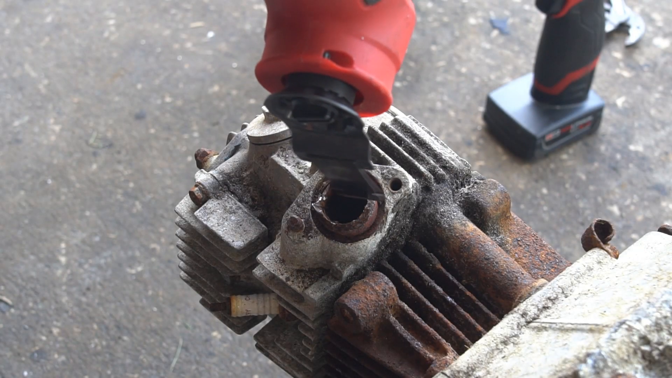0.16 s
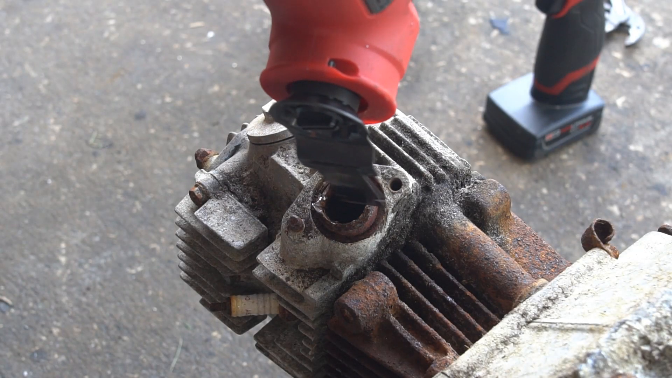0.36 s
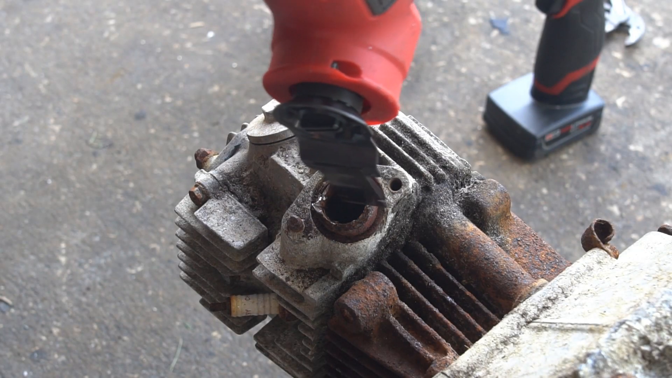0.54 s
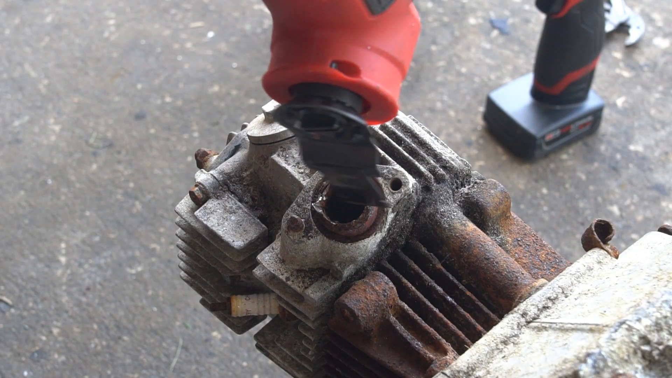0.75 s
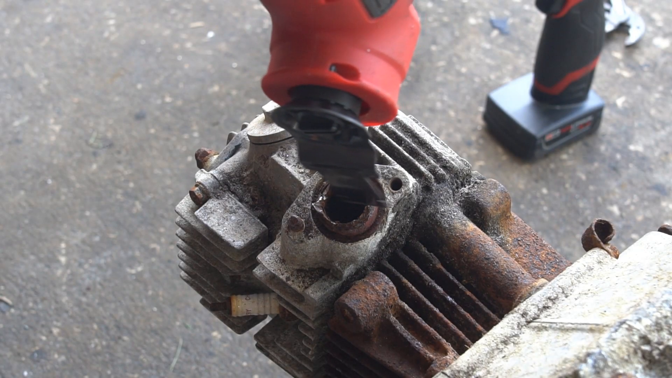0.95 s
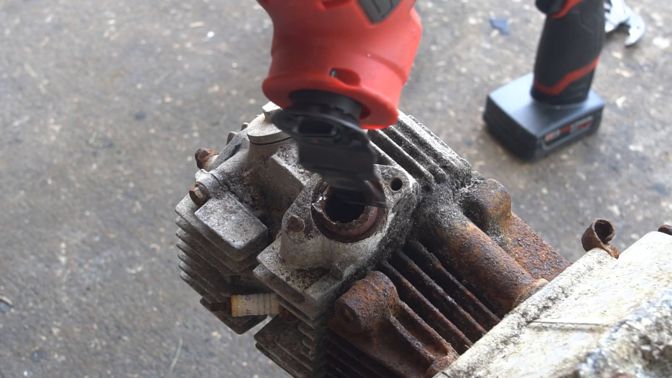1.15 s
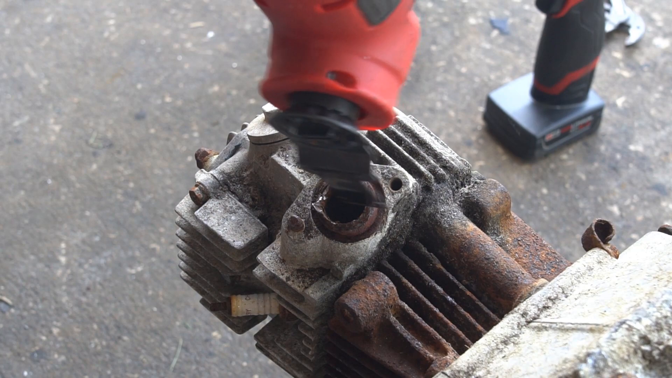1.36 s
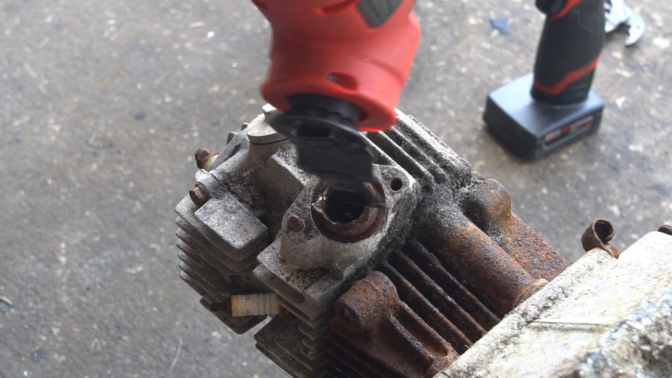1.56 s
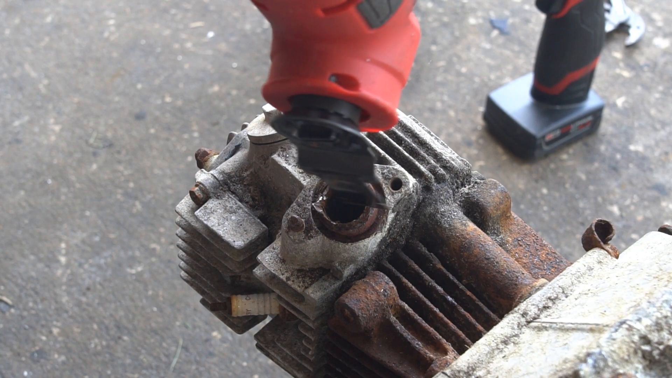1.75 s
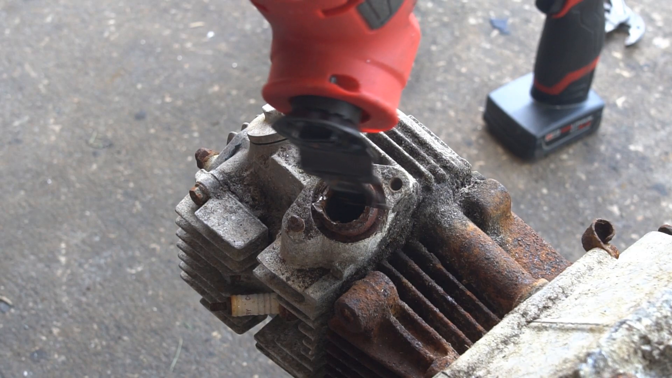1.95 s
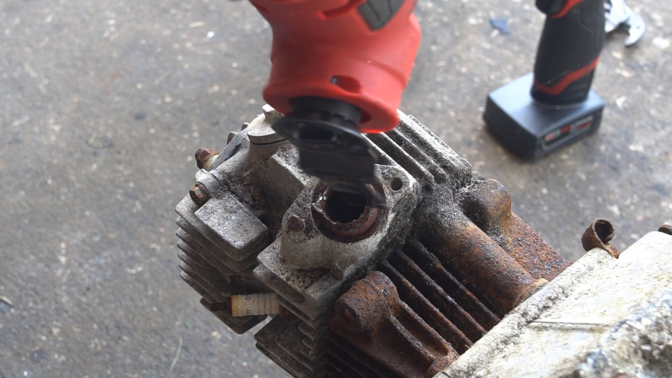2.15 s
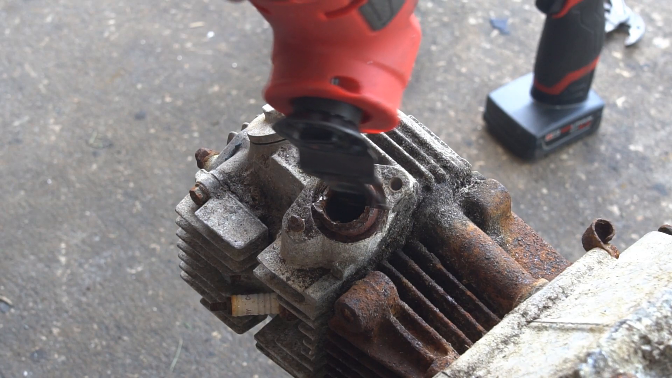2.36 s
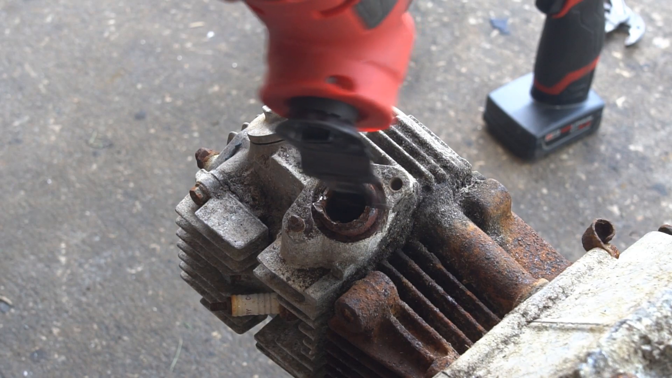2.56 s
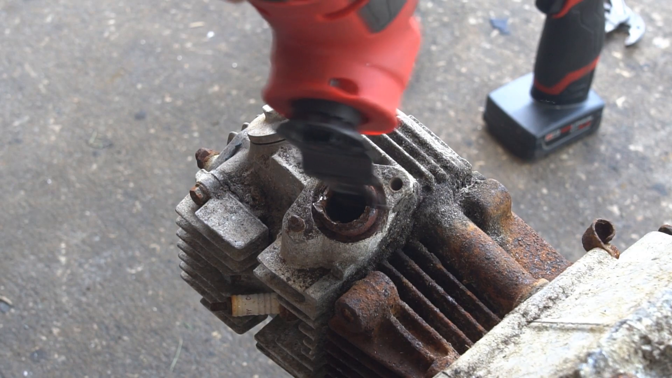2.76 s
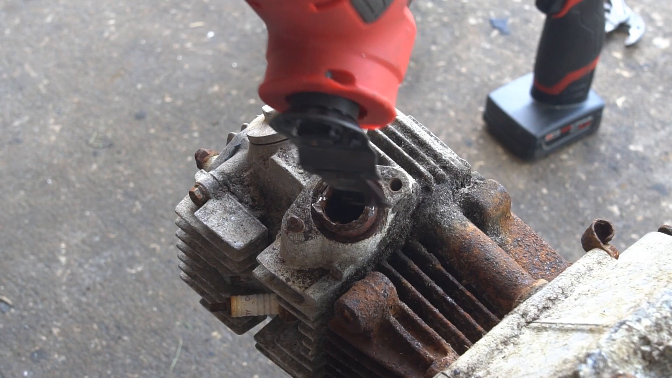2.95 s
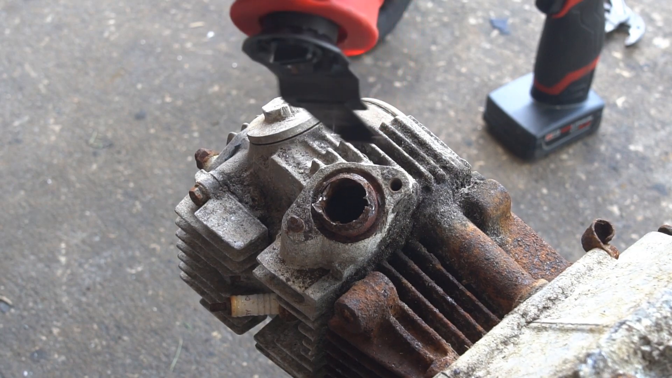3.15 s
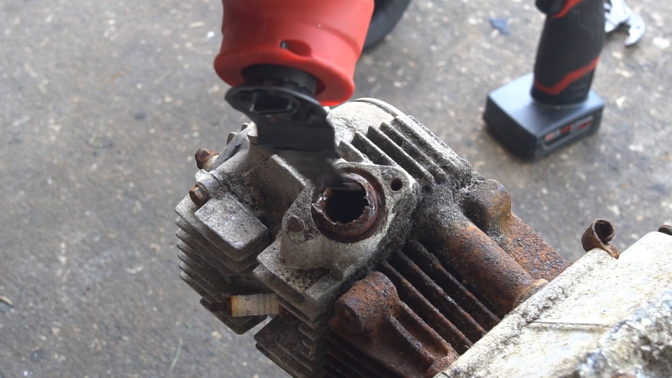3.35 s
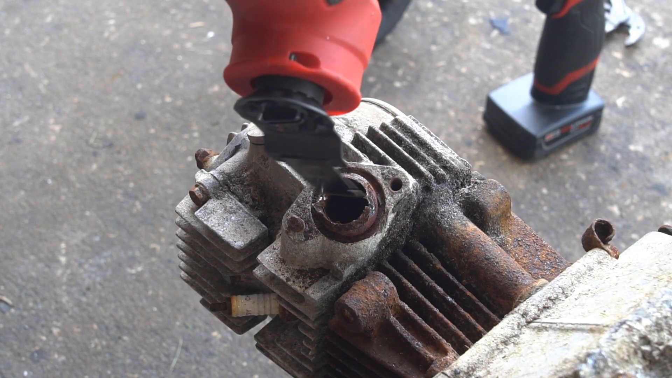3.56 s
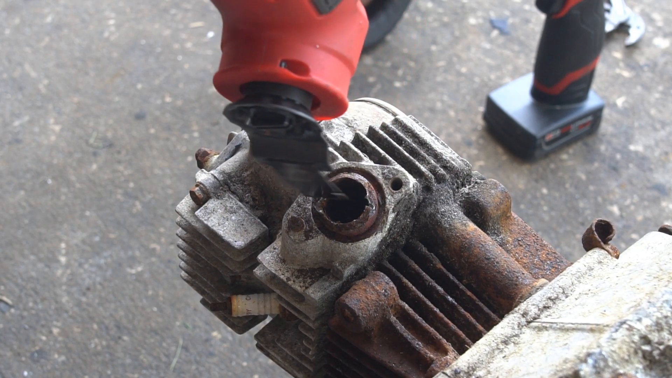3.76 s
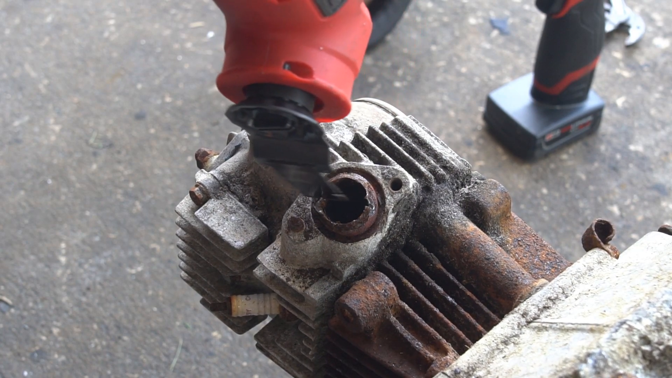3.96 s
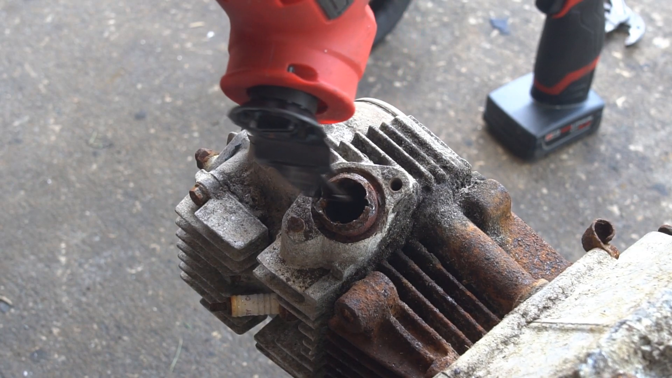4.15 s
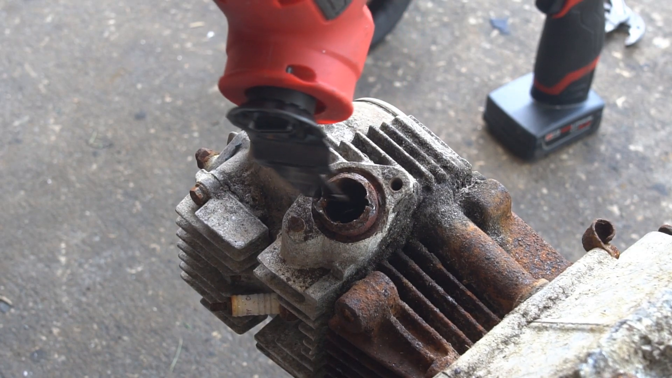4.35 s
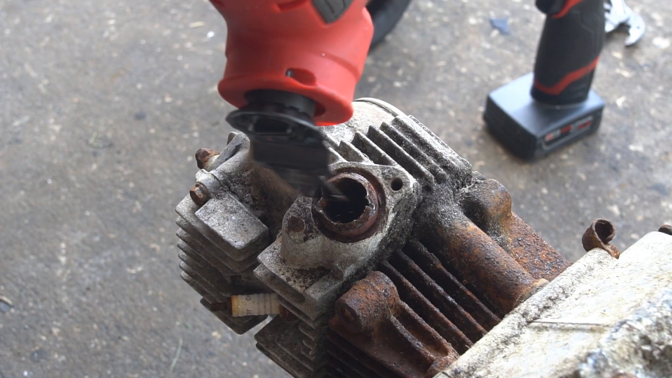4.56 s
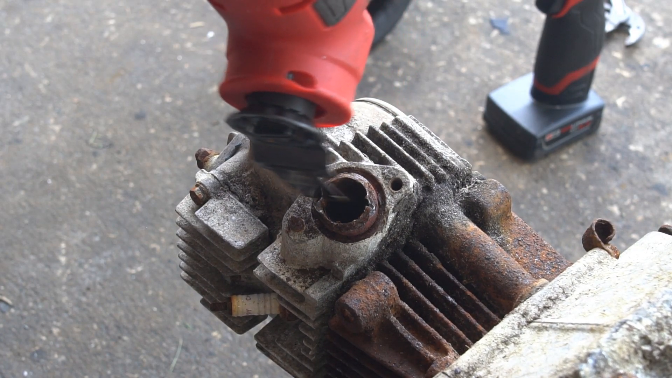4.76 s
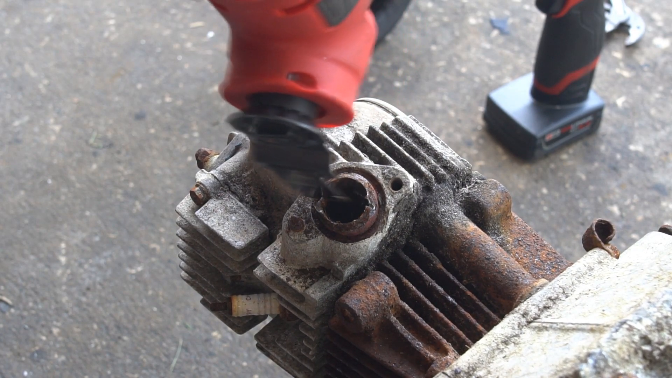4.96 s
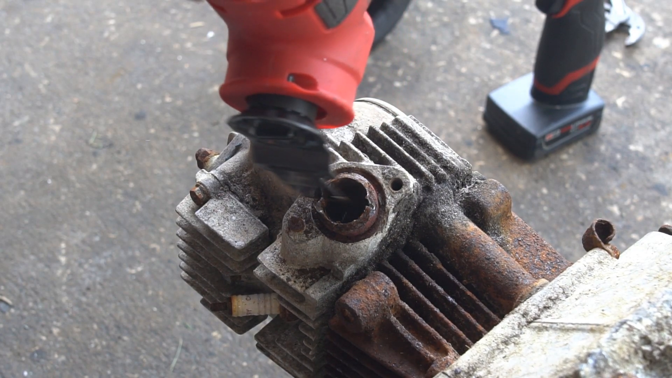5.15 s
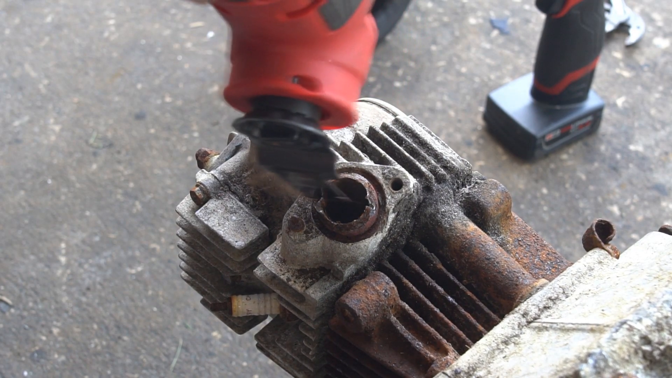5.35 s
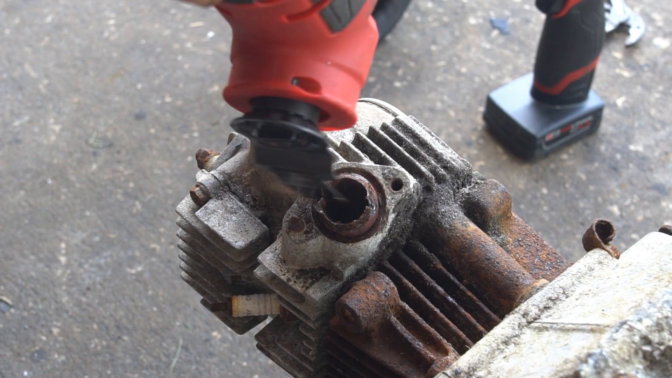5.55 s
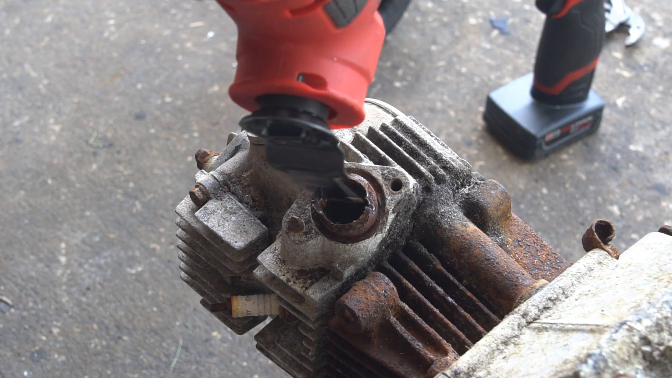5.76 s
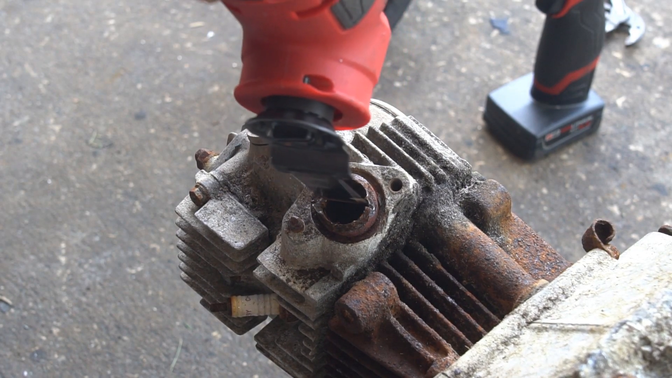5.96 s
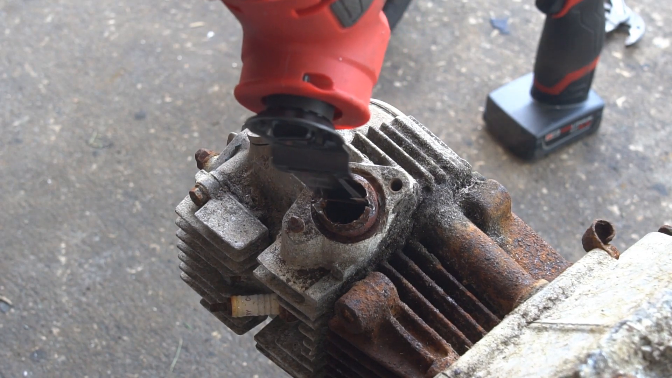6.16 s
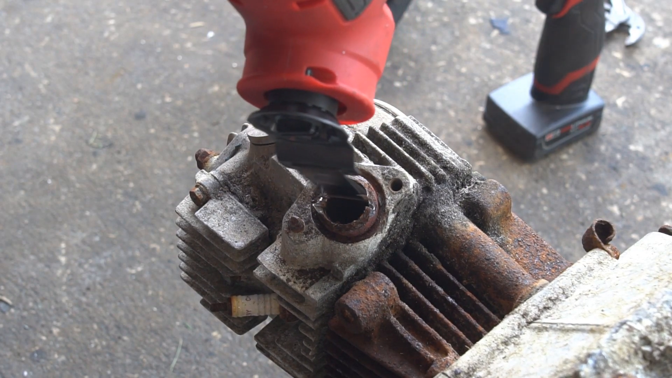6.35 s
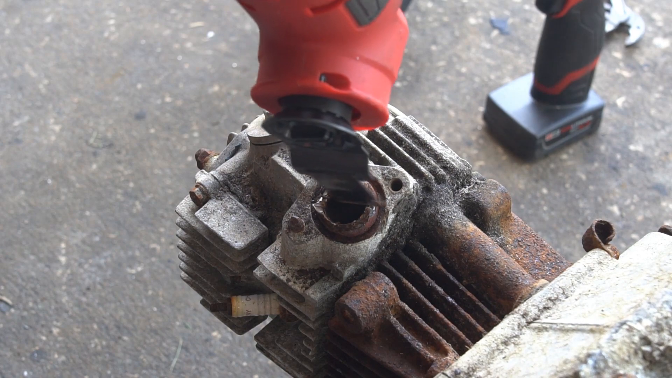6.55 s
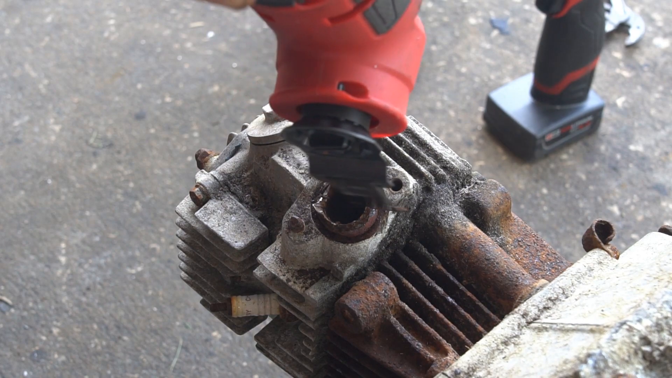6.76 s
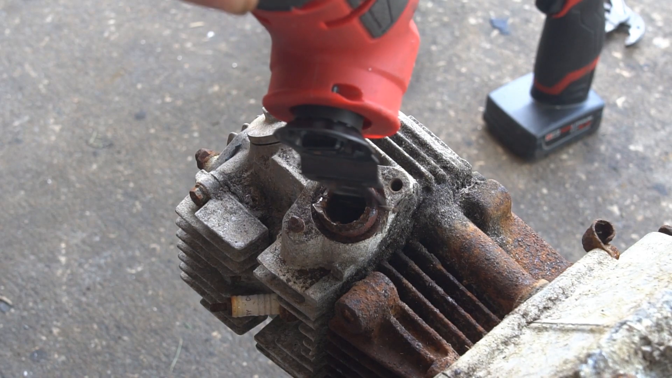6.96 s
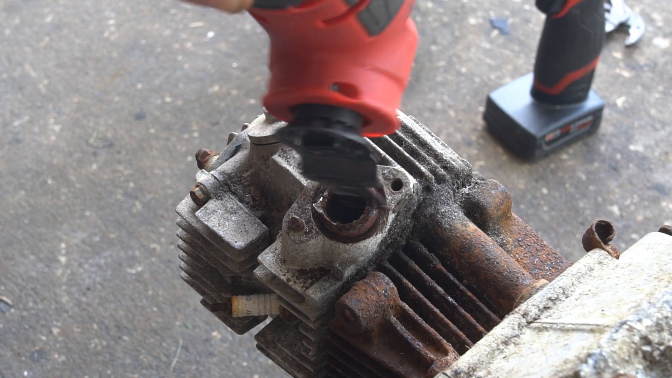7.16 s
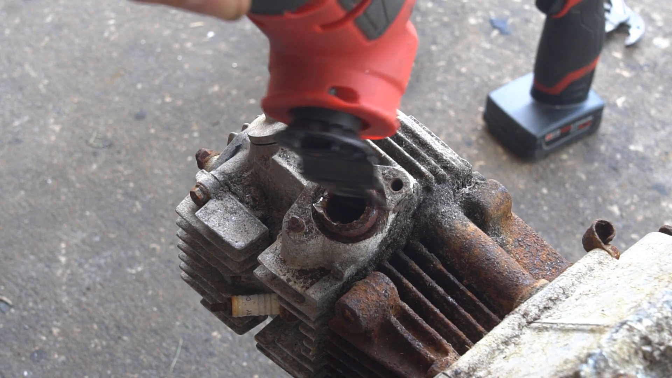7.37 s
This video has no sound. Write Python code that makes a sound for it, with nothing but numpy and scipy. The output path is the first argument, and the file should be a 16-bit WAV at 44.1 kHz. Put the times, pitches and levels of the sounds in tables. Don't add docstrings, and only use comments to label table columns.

```python
import sys
import numpy as np
from scipy import signal
from scipy.fft import rfft, irfft, next_fast_len
from scipy.io import wavfile
from scipy.ndimage import uniform_filter1d, map_coordinates

SR = 44100
rng = np.random.default_rng(int(sys.argv[2]) if len(sys.argv) > 2 else 0)


def natural_amplitude(level_db):
    exponent = np.asarray(level_db, float) / 20
    return 10 ** exponent


def digitize_waveform(pressure):
    field = np.atleast_2d(pressure).T
    bounded = np.clip(field, -1, 1)
    quanta = np.round(bounded * 32767).astype(np.int16)
    wavfile.write(sys.argv[1], SR, quanta)


N = 326781
T = np.arange(N) / SR

# (time [s], scrape [dB], share passed into the casting [dB])
CUT_LEVELS = [
    [(.29, -27, 3), (.3, -26, 1), (.45, -21, -2), (.7, -21.5, -1.5), (1.6, -18.5, -3), (2.86, -19, -2),
     (2.93, -24, -3), (2.96, -28.5, -7), (3.0, -33.5, -2)],
    [(3.678, -35.5, 9), (3.7, -28.5, 0), (3.74, -21, -9.5), (3.9, -20, -6), (4.2, -18.5, -6),
     (4.7, -19, -2.5), (5.72, -20, -2.5), (5.77, -28.5, -11.5), (5.85, -32.5, -5)],
    [(5.954, -35, 0), (6.0, -23.5, -11.5), (6.2, -21.5, -12.5), (6.29, -23, -8.5), (6.33, -31.5, -3),
     (6.41, -38, 2.5)],
    [(6.546, -28, -5), (6.585, -33, 2.5), (6.63, -29, -5), (6.71, -25, -3.5), (6.79, -25.5, -9),
     (6.83, -18.5, -6), (6.87, -21.5, -5), (7.41, -19, -2)],
]
# (time [s], share on the corner [0-1], share barely touching [0-1])
BLADE_HOLD = [(0, 0, 0.65), (.55, 0, 0.78), (.9, 0, 0.22), (1.3, 0, 0.04), (2.85, 0, 0), (3, 0, 0.12),
              (3.6, 0.7, 0.6), (3.75, 0.86, 0.12), (4.2, 0.99, 0.02), (5.7, 0.96, 0.04), (5.8, 0.6, 0.54),
              (6, 0.18, 0.94), (6.4, 0, 0.8), (6.7, 0, 0.44), (6.9, 0.08, 0.13), (7.41, 0, 0.02)]
# (time [s], lift depth [dB], lift length [s])
LIFT_BITES = [(0.344, 16, 0.012), (0.4617, 0.5, 0.022), (0.51, 16, 0.018), (.538, 6, .012), (.333, 7, .005),
              (.589, 6, .005), (.604, 12, .012), (.631, 9.5, 0.029), (.639, 11, .004), (.697, 6, .004),
              (.705, 2, .012), (.775, 1.5, 0.016), (.83, 2, 0.013), (.945, 6, 0.011), (1.265, 6, 0.019),
              (1.508, 6.5, 0.018), (2.05, 9, 0.01), (2.162, 3, 0.011), (2.68, 4, 0.011), (3.72, 11, 0.02),
              (3.775, 9.5, 0.03), (3.845, 8, 0.03), (3.91, 7.5, 0.02), (3.964, 4, 0.018),
              (4.029, -1, 0.012), (4.07, -3, 0.011), (6.06, 4, 0.014), (6.13, -1, 0.0099), (6.225, 1, .012),
              (4.124, 9, .006), (5.3946, 5, 0.0041), (5.999, 6, 0.015), (6.335, 3, 0.014), (6.385, 6, 0.01),
              (6.623, 23, 0.024), (6.7117, 7, 0.013), (6.732, 4, .006), (6.8244, 4, .012),
              (6.909, 5, 0.008), (6.9596, 2.5, 0.022), (7.214, 5, 0.013)]
# (time [s], level [dB])
TOOTH_STRIKES = [(.373, 7), (.404, 3), (.583, 1), (.797, 9), (.908, 10.5), (2.089, 3), (.512, 5),
                 (3.729, 6), (4.029, 5), (4.145, -4), (5.96, 7), (6.552, 6), (6.625, 9), (6.639, 2),
                 (.519, 3), (.632, 4), (6.934, 5), (6.647, -2), (3.686, 4), (3.795, 4), (6.715, 12),
                 (6.739, 0), (6.756, 4), (6.826, 7), (6.836, 6), (6.846, -1), (6.857, -11), (6.869, 0),
                 (6.884, 4), (6.876, 3), (6.892, 3), (6.808, 4), (7.188, 3)]
# (time [s], level [dB])
BLADE_TWANGS = [(.3, 17.5), (.468, 16), (0.4, 6), (.55, 3), (0.66, 7), (.74, 8), (6.245, 7), (6.39, 8),
                (.68, 14), (1.09, 22), (3.705, 24), (6.295, 10.5), (6.562, 16), (6.015, 3), (6.15, 2)]
BLADE_MODES_HZ = [6840, 7170, 7480, 8820, 9150, 9400, 10320, 10790, 11750, 12380, 13350, 14530, 14850,
                  15480]
# (width [Hz], held flat [dB], on the corner [dB], barely touching [dB], hopping [dB])
BLADE_RESPONSE = [(201, -0.5, -1.5, -7, -15), (150, 0, -4, 8, 1.5), (100, -7.5, -3, -1.5, -6.5),
                  (231, -6, -4.5, -10.5, -26), (150, -14.5, 0, -9, -12), (150, -26.5, -1.5, -5, -1),
                  (68.6, -1.5, -8, -25, -25), (60.4, -1.5, 5, -3, 3), (90, -8.5, -10, -11, -3),
                  (190, -6.5, 2, -10, -5), (200, -15, -11, -32, -16), (60, -6, 0, 0, 3.5),
                  (150, -33, -1.5, -27, -17), (150, -6, -0.5, -30, -22)]
CASTING_MODES_HZ = [1260, 1400, 1700, 1840, 2040, 2128, 2612, 2930, 3735, 4290, 4460, 4840, 5450]
# (width [Hz], held flat [dB], on the corner [dB], barely touching [dB])
CASTING_RESPONSE = [(91.5, -12, -11, -8), (158, -24.5, -24, -2.5), (147.7, -2, -3.5, -5),
                    (81, -2, -0.5, -6), (91, -11.5, -7.5, -23), (50, 1.5, 1.5, -11), (45, -3, -7, -6.5),
                    (198, 0, -1, 0), (80, -2.5, -2, -4.5), (80.5, -3.5, -2.5, -5), (150, -7.5, -7, -8),
                    (50.3, 0, -6, -4), (201, -8.5, -7.5, -9.5)]
# (frequency [Hz], level [dB])
CASTING_RASP = [(60, -95), (600, -146), (1000, -9.5), (1400, -11), (2300, -9.5), (3300, -5.5), (4500, -6),
                (5500, -7), (6500, -6.5), (7500, -12.5)]
# (frequency [Hz], level [dB])
BLADE_RASP = [(200, -95), (4800, -42), (5800, -15), (6600, -17.5), (8000, -9), (10000, -11), (13000, -12.5),
              (16000, -10)]
# (frequency [Hz], width [Hz], depth [dB])
MODE_HOLLOWS = [(1500, 26, 0.5), (1940, 42, 1), (2260, 160, 1), (2730, 43, 3), (4120, 94, -0.5),
                (7470, 200, 0.5), (9860, 200, 3.5), (13160, 240, 6)]
# (frequency [Hz], width [Hz], level [dB])
FEET_MODES = [(450, 26, 6), (745, 14, 7)]
# (frequency [Hz], density [dB per Hz])
FLOOR_THUD = [(59, -65), (100, -35), (177, -23), (254, -4.5), (387, -2), (441, 1.5), (909, 4), (1100, 4),
              (1430, -7), (2420, -120)]
# (multiple of the swing, level [dB])
HALF_ORDERS = [(2.5, -60), (3.5, -58), (5.5, -55)]
# (time [s], peak [dB], frequency [Hz])
CASTING_KNOCKS = [(1.372, -21, 430), (2.006, -19, 443), (2.141, -19, 666), (2.376, -15, 640),
                  (2.446, -15, 726), (2.536, -12, 590), (2.558, -11, 675), (2.58, -15, 680),
                  (2.617, -12, 720), (2.742, -18.5, 583), (2.805, -14, 650), (2.827, -18, 700),
                  (4.586, -21, 711), (4.758, -19, 570), (4.794, -17, 680), (4.907, -17, 515),
                  (4.968, -15, 740), (4.988, -11, 676), (5.01, -12.5, 610), (5.321, -22, 570),
                  (5.358, -12, 750), (5.38, -12, 640), (7.194, -19.5, 693), (7.328, -17, 716),
                  (7.388, -16, 708)]
# (time [s], peak [dB])
EDGE_CLACKS = [(2.3775, -18), (2.5605, -15), (2.5802, -11), (2.6193, -12), (2.718, -16), (2.807, -13),
               (2.828, -16), (4.969, -15), (4.990, -15), (5.0122, -11), (5.360, -14), (5.3818, -11),
               (6.7263, -22), (7.19, -14)]
# (multiple of the swing, level [dB])
GEAR_ORDERS = [(1, -32), (2, -31), (3, -12), (4, -16), (5, -30), (6, -4.5), (7, -10), (8, -8), (9, -8),
               (10, -7), (11, -16), (12, -13), (13, -12), (14, -10), (15, -1), (16, -9), (17, -13),
               (18, -4), (19, -16), (20, -8), (21, -9), (22, -20), (23, 0), (24, -13), (25, -12), (26, -3)]
UPPER_ORDERS_DB = [-12, -14, -10, -18, -18, -17, -15, -17, -13, -14, -15, -10, -14, -16, -18, -18, -20, -20]
# (time [s], order 23 [dB], order 20 [dB], order 26 [dB], higher orders [dB])
TOOL_TURN = [(0, 3, 2, 3, 1), (.09, 1, 0, -4, 1), (.25, -1, 4, 3, 3), (3.0, -5, 0, -9, -1),
             (3.12, -7, -7, -1, -3), (3.26, -5, -6, 1, -3), (3.33, 3, 2, -9, -2), (3.42, 2, -1, -5, -7),
             (3.68, 0, 3, -1, -7), (4.2, -4, 0, 0, 0), (5.82, -4, -2, -8, 0), (5.91, 1, 8, 0, 2),
             (6.1, -8, -2, -3, -2), (6.25, -2, 6, 5, 0), (6.45, -2, 9, 1, 0), (6.7, -8, -2, -3, -3)]
# (time [s], order 14 [dB], order 21 [dB], order 18 [dB], order 6 [dB])
TOOL_TURN_FURTHER = [(0, 4, 1, 4, -3), (.08, 6, 2, 2, -3), (.17, 6, 3, 6, -3), (.25, 3, 7, 3, -3),
                     (.9, 0, 0, -6, -3), (3.0, -5, -2, -2, 0), (3.2, -9, 2, -1, 2), (3.33, -5, 0, 1, 2),
                     (3.48, 2, -7, -4, -1), (3.6, 3, -3, 4, -1), (4.0, 0, 0, -8, -4), (5.8, 3, 0, -1, -1),
                     (5.85, 6, -1, 9, 0), (5.93, 1, 5, 6, -3), (6.1, 6, 0, 0, 3), (6.3, 6, 0, 4, 3),
                     (6.5, 8, 0, 4, 2), (6.7, 3, 0, -6, -1)]
# (frequency [Hz], density [dB per Hz])
AIR_WHIRR = [(60, -37), (200, -29), (500, -22.5), (850, -18), (1200, -13), (2000, -11.5), (2900, -7),
             (4900, -8.5), (7000, -7.5), (9000, -7.5), (12000, -14.5), (16000, -28.5)]
# (frequency [Hz], level [dB])
SHOP_HUM = [(150.7, -71.5), (209.9, -70.5), (242.2, -71), (269.2, -72)]
# (frequency [Hz], density [dB per Hz])
FAR_RUMBLE = [(20, -16), (50, -13), (90, -12), (141, 5), (176, -15), (241, -14), (330, -30), (600, -100)]
# (frequency [Hz], correlation [-1 to 1])
STEREO_LIKENESS = [(60, .998), (150, 0.99), (400, 1), (620, 0.95), (950, 0.93), (2380, 0.63), (5980, 0.57),
                   (15000, 0.49)]
# (frequency [Hz], difference [dB])
STEREO_LEAN = [(60, -.5), (180, 0), (550, -0.5), (1650, -2), (4970, 1.5), (15000, 0)]

SWING_HZ = 186.4
HOP_START_S, HOP_END_S, HOP_RAMP_S, HOP_DB = 5.97, 6.36, 0.08, 5
LAND_S, LEAVE_S, CATCH_S = 0.0067, 0.025, 0.0026
CHATTER_DB, REBOUND, STRIKE_S = 2, 0.16, 0.0022
FLOOR_DB, LOOSE_DB = -20.5, -51
RING_HZ, RING_WIDTH_HZ, RING_DB, RING_FREE_DB, TWANG_S = 3365, 120, -41.5, 11, 0.014
CLACK_HZ, CLACK_DB, CLACK_S, CLACK_LAG_S = 1600, -1.5, 0.0005, 0.002
MOTOR_DB, TONES_DB = -36, -38.8
LOW_DB, LOW_FREE_DB, FLUTTER_DB = 1, -8, 0.9
BEAT_HZ, SWAY_RAD, SWELL = 27, 0.024, 0.01
RELEASE_S = 0.051
BOUNCE_S = 0.000512


def unit(x):
    return x / np.sqrt(np.mean(x ** 2) + 1e-20)


def along(points, hz):
    f, v = np.transpose(points)
    return np.interp(np.log(hz + 1), np.log(f + 1), v)


def curves(rows):
    s, *cols = np.transpose(rows)
    return [np.interp(T, s, c) for c in cols]


def wobble(rate_hz):
    return map_coordinates(rng.standard_normal(int(N * rate_hz / SR) + 4), [T * rate_hz])


def spell(start_s, end_s, rise_s, fall_s):
    return np.interp(T, [start_s, start_s + rise_s, end_s, end_s + fall_s], [0, 1, 1, 0])


def filtered(x, response):
    m = next_fast_len(N + SR // 4)
    return irfft(rfft(x, m) * response(np.fft.rfftfreq(m, 1 / SR)), m)[..., :N]


def patchy(x, depth_db, size=(5, 7)):
    z = signal.stft(x, nperseg=512)[2]
    field = uniform_filter1d(rng.standard_normal(z.shape[1:]), size[0], 0)
    field = unit(uniform_filter1d(field, size[1], 1))
    gain = natural_amplitude(depth_db * field - np.log(10) / 20 * depth_db ** 2)
    return signal.istft(z * gain, nperseg=512)[1][:, :N]


def metal(modes_hz, widths_hz, levels_db, rasp, rasp_db=0):
    def response(f):
        modes = []
        for c, w, db in zip(modes_hz, widths_hz, levels_db):
            modes.append(natural_amplitude(db) * 1j * f * w / (c * c - f * f + 1j * f * w + 1))
        power = sum(abs(m) ** 2 for m in modes) + natural_amplitude(along(rasp, f) + rasp_db) ** 2
        hollow_db = sum(db * np.exp(-((f - c) / w) ** 2) for c, w, db in MODE_HOLLOWS)
        phase = np.angle(sum(modes[::2]) - sum(modes[1::2]))
        return unit(np.sqrt(power) * natural_amplitude(-hollow_db)) * np.exp(1j * phase)
    return response


def cutting():
    scrape_db, seating_db = curves(np.vstack(CUT_LEVELS))
    casting_db = scrape_db + seating_db
    touching = sum(spell(c[0][0], c[-1][0], LAND_S, LEAVE_S) for c in CUT_LEVELS)
    press = touching * pressure()
    corner, light = np.clip(curves(BLADE_HOLD), 0, 1)
    flat = np.clip(1 - corner - light, 0, 1)
    iron = casting(casting_db, press, (flat, corner, light))
    steel = blade(scrape_db, press, flat, corner, light) + blade_ring(scrape_db, press, light)
    return patchy(iron, depth_db=0.9, size=(3, 16)) + patchy(steel, depth_db=1.0) + floor(casting_db, press)


def pressure():
    db = CHATTER_DB * (0.06 * wobble(24) + 0.38 * wobble(50) + 0.088 * wobble(110))
    hop_db = HOP_DB * spell(HOP_START_S, HOP_END_S - HOP_RAMP_S, HOP_RAMP_S, HOP_RAMP_S)
    since_landing = (SWING_HZ * T / 2 + 0.62 + 0.04 * wobble(30)) % 1
    db += hop_db * (2.6 * np.exp(-2.6 * since_landing) - 1.1)
    for s, depth_db, lift_s in LIFT_BITES:
        i = round(s * SR)
        near = slice(max(i - 4000, 0), i + 4000)
        u = (T[near] - s) / max(lift_s, 0.003)
        db[near] += depth_db * np.where(u < 0, -np.exp(-u ** 2), REBOUND * np.exp(-abs(u)))
    db = uniform_filter1d(db, round(CATCH_S * SR))
    bite = np.exp(-T[:2000] / STRIKE_S)
    for s, hook_db in TOOTH_STRIKES:
        db[round(s * SR):][:len(bite)] += hook_db * bite
    return natural_amplitude(db)


def teeth(spiky_db, strikes):
    stroke = natural_amplitude(0.9 * np.sin(4 * np.pi * SWING_HZ * T) + 1.1 * np.sin(2 * np.pi * SWING_HZ * T))
    size = stroke * natural_amplitude(spiky_db * wobble(900) + 0.17 * wobble(220))
    struck = rng.random(N) < 500 / SR * stroke ** 3
    hard = struck * rng.exponential(1, N) * rng.choice([-1, 1], (2, N))
    return unit(unit(size * rng.standard_normal((2, N))) + strikes * unit(hard))


def hop_tick():
    jolt = np.exp(-(((SWING_HZ * T / 2 - 0.1) % 1 - 0.5) / 0.09) ** 2)
    return natural_amplitude(spell(HOP_START_S, HOP_END_S, HOP_RAMP_S, HOP_RAMP_S) * (6 * jolt - 3))


def casting(casting_db, press, shares):
    drive = natural_amplitude(casting_db + 0.72 * wobble(30)) * press ** 0.72 * hop_tick()
    drive = drive * teeth(spiky_db=1.0, strikes=0.49)
    widths_hz, *held_db = np.transpose(CASTING_RESPONSE)
    iron = 0
    for share, db in zip(shares, held_db):
        iron = iron + filtered(drive * np.sqrt(share), metal(CASTING_MODES_HZ, widths_hz, db, CASTING_RASP))
    return iron


def blade(scrape_db, press, flat, corner, light):
    drive = (natural_amplitude(scrape_db) * press + natural_amplitude(LOOSE_DB)) * teeth(spiky_db=3.0, strikes=0.27)
    hop = spell(HOP_START_S, HOP_END_S - HOP_RAMP_S, HOP_RAMP_S / 2, HOP_RAMP_S)
    width_hz, flat_db, corner_db, light_db, hop_db = np.transpose(BLADE_RESPONSE)
    holds = [  # share, width factor, mode levels, rasp [dB]
        (flat, 1, flat_db, 0),
        (corner, 2.0, corner_db, 4),
        (light * hop, 0.6, hop_db, -24),
        (light * (1 - hop), 0.66, light_db, -20),
    ]
    out = 0
    for share, widen, db, rasp_db in holds:
        response = metal(BLADE_MODES_HZ, widen * width_hz, db, BLADE_RASP, rasp_db)
        out = out + filtered(drive * np.sqrt(share), response)
    return out


def blade_ring(scrape_db, press, light):
    twang_db = sum(db * np.exp(-((T - s) / TWANG_S) ** 2) for s, db in BLADE_TWANGS)
    level_db = scrape_db + RING_DB + RING_FREE_DB * np.sqrt(light) + twang_db
    drive = natural_amplitude(level_db) * press * teeth(spiky_db=3.0, strikes=0.13)
    drive *= 1 + 0.41 * np.sin(np.pi * SWING_HZ * T)
    return filtered(drive, lambda f: unit(1j * f / (RING_HZ ** 2 - f * f + 1j * f * RING_WIDTH_HZ)))


def floor(casting_db, press):
    drive = natural_amplitude(casting_db + FLOOR_DB + 1.6 * wobble(25)) * press ** 0.85 * rng.standard_normal((2, N))
    return filtered(drive, metal(*np.transpose(FEET_MODES), FLOOR_THUD))


def hopping():
    landing = spell(HOP_START_S - 0.02, HOP_END_S - 0.03, 0.05, 0.05)
    tones = sum(natural_amplitude(db + 5.4 * wobble(14)) * np.sin(2 * np.pi * k * SWING_HZ * T) for k, db in HALF_ORDERS)
    return landing * tones * [[1], [0.4]]


def knocks():
    out, t = np.zeros(N + SR), np.arange(SR // 16) / SR
    for s, db, hz in CASTING_KNOCKS:
        ring = sum(a * np.sin(2 * np.pi * r * hz * t) for r, a in ((1, 1), (1.56, 0.55), (0.497, 0.3)))
        envelope = natural_amplitude(db - 1.5 - 60 * t / 0.016) * (1 - np.exp(-t / 0.0016))
        out[round(s * SR):][:len(t)] += envelope * ring
    u = (t - CLACK_LAG_S) / CLACK_S
    clack = np.exp(-u * u) * np.sin(2 * np.pi * CLACK_HZ * CLACK_S * u)
    for s, db in EDGE_CLACKS:
        out[round((s - CLACK_LAG_S) * SR):][:len(t)] += natural_amplitude(db + CLACK_DB) * clack
    return filtered(out[:N], lambda f: f ** 4 / (f ** 4 + 220 ** 4)) * [[1], [0.6]]


def motor():
    *turned_db, top_db = curves(TOOL_TURN)
    aimed_db = dict(zip((23, 20, 26, 14, 21, 18, 6), turned_db + curves(TOOL_TURN_FURTHER)))
    aimed_db[18] = aimed_db[18] + FLUTTER_DB * wobble(25)
    light = np.clip(curves(BLADE_HOLD)[1], 0, 1)
    low_db = LOW_DB + LOW_FREE_DB * np.maximum(light - 0.4, 0)
    beat = np.sin(2 * np.pi * BEAT_HZ * T)
    turn = 2 * np.pi * np.cumsum(SWING_HZ * (1 + 0.00017 * wobble(2.93))) / SR
    tones = 0
    for k, level_db in GEAR_ORDERS + list(enumerate(UPPER_ORDERS_DB, 27)):
        aim_db = aimed_db.get(k, top_db if k > 26 else low_db if k < 6 else 0)
        drift_db = (0.7 if k in aimed_db or k < 11 else 2) * wobble(4)
        skirt = 0.07 * wobble(70) + SWELL * k * np.roll(beat, 431 * k)
        start_rad = rng.normal(0, 1.53) + rng.normal(0, 0.6, (2, 1))
        tone = np.sin(k * (turn + SWAY_RAD * beat) + start_rad)
        tones = tones + natural_amplitude(level_db + aim_db + drift_db) * (1 + skirt) * tone
    rattle = natural_amplitude(1.6 * np.sin(2 * turn) + 0.8 * wobble(40)) * rng.standard_normal((2, N))
    whirr = unit(filtered(rattle, lambda f: natural_amplitude(along(AIR_WHIRR, f))))
    return natural_amplitude(TONES_DB) * tones + natural_amplitude(MOTOR_DB - 1.5 + 0.25 * top_db) * patchy(whirr, depth_db=0.7)


def shop():
    hum = 0
    for hz, db in SHOP_HUM:
        hum = hum + natural_amplitude(db + 2.5 + 1.7 * wobble(6.9)) * np.sin(2 * np.pi * hz * T + wobble(2.9))
    lumps = natural_amplitude(3.1 * wobble(5.4)) * rng.standard_normal((2, N))
    return hum + natural_amplitude(-74) * unit(filtered(lumps, lambda f: natural_amplitude(along(FAR_RUMBLE, f))))


def room(pair):
    def angle(f):
        return np.arccos(np.clip(along(STEREO_LIKENESS, f), -1, 1)) / 2

    echoes = rng.standard_normal(300) * natural_amplitude(-60 * T[:300] / 0.14)

    def lead(f):
        return 1j * unit(rfft(echoes, 2 * len(f) - 2).imag)

    def bounce(f):
        return 1 - 0.028 * f * f / (f * f + 1200 ** 2) * np.exp(-2j * np.pi * f * BOUNCE_S)

    near, far = filtered(pair, lambda f: np.array([np.cos(angle(f)), np.sin(angle(f))]))
    sideways = filtered(pair[0], lambda f: lead(f) * np.sin(angle(f)))
    side = 0.82 * far + 0.57 * sideways
    both = filtered(near, bounce) + side * [[1], [-1]]
    return filtered(both, lambda f: natural_amplitude(along(STEREO_LEAN, f) * [[0.5], [-0.5]]))


def scene():
    cut = filtered(cutting(), lambda f: f ** 4 / (f ** 4 + 130 ** 4))
    cut = cut + knocks()
    keep = np.exp(-1 / (RELEASE_S * SR))
    loud = signal.lfilter([1 - keep], [1, -keep], cut[0] ** 2)
    ducked = (1 + loud / natural_amplitude(-25) ** 2) ** -0.36
    return room(cut + hopping() + ducked * motor() + ducked ** 0.32 * shop())


def low_pass(x):
    return signal.sosfilt(signal.butter(12, 16900, fs=SR, output="sos"), x)


def record(dry):
    held = dry / (1 + abs(dry / 0.78) ** 10) ** 0.1
    band = filtered(held, lambda f: (f / 35) ** 2 / (1 + (f / 35) ** 2) / (1 + (f / 15710) ** 400))
    return low_pass(band)


dry = scene()
out = record(dry)
digitize_waveform(out)
```